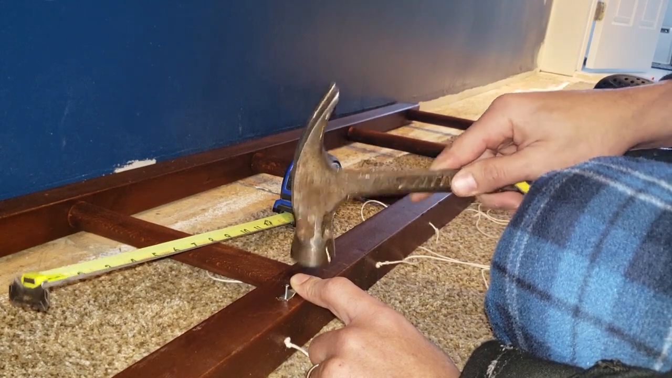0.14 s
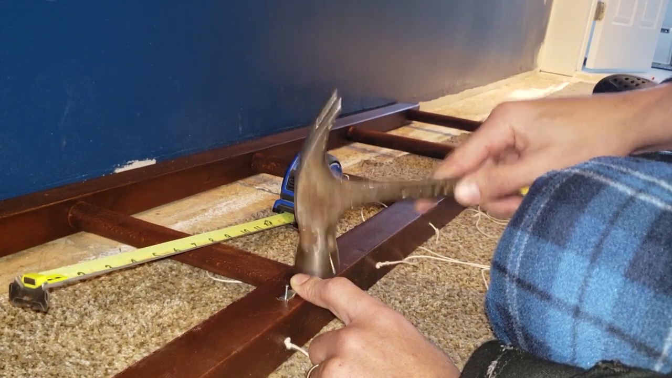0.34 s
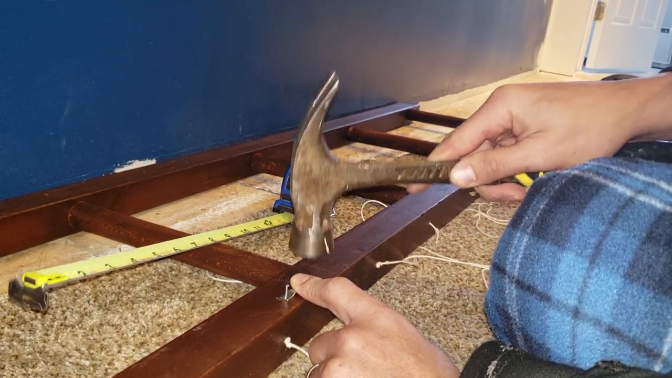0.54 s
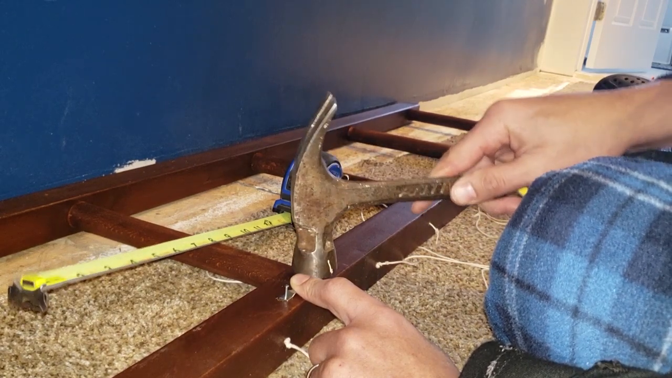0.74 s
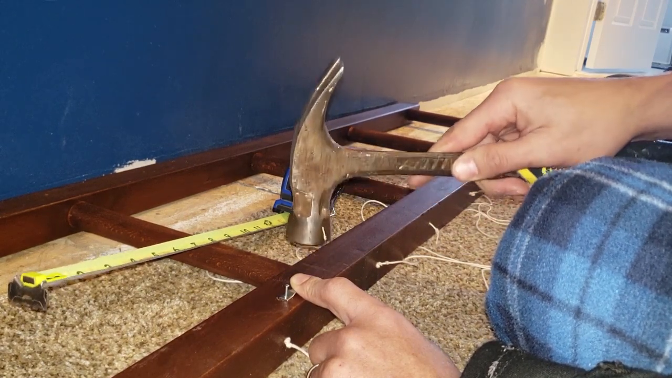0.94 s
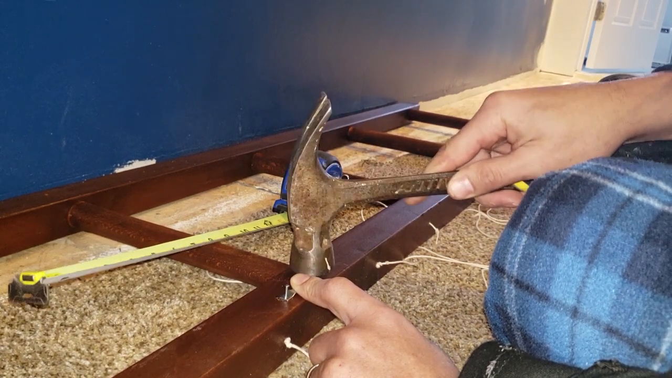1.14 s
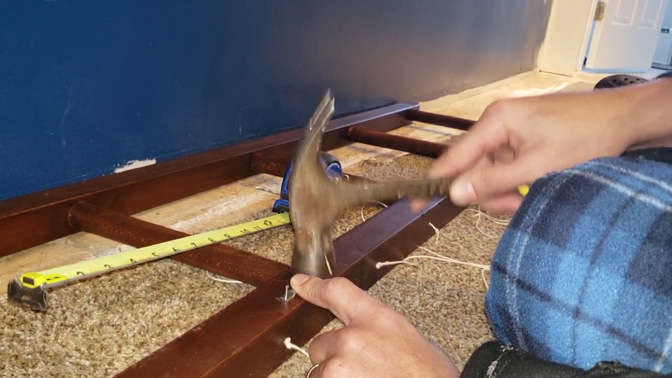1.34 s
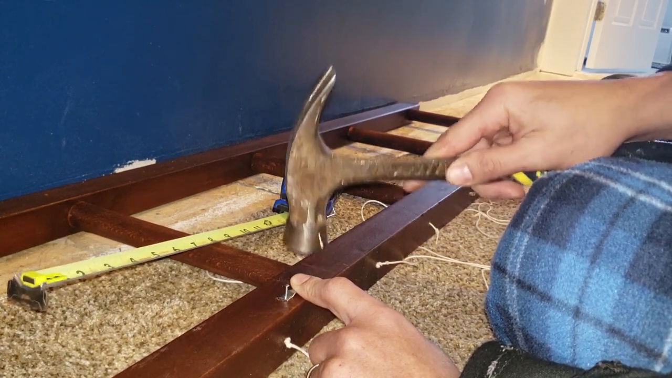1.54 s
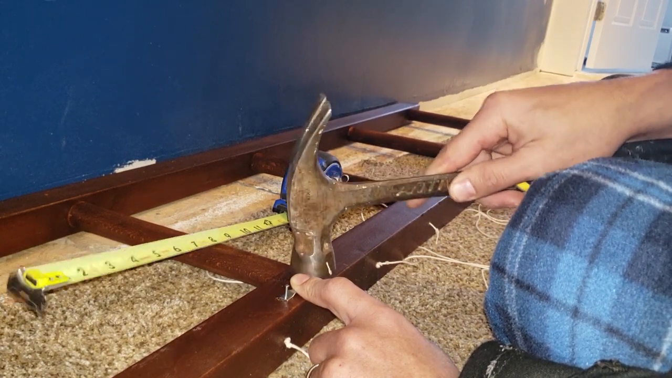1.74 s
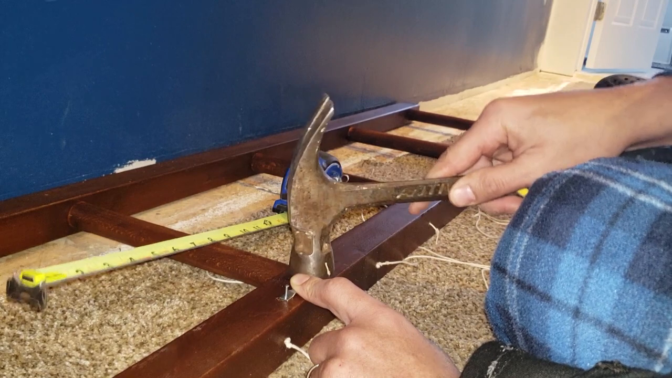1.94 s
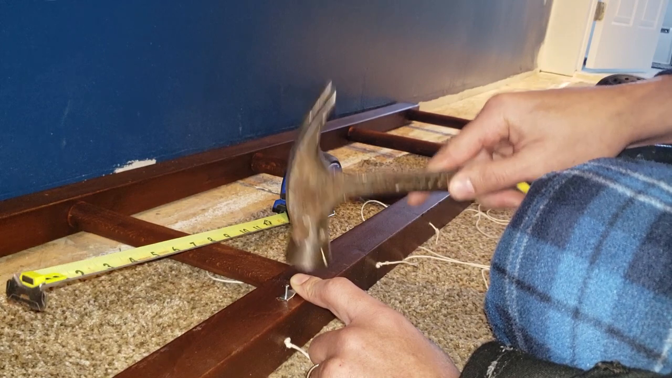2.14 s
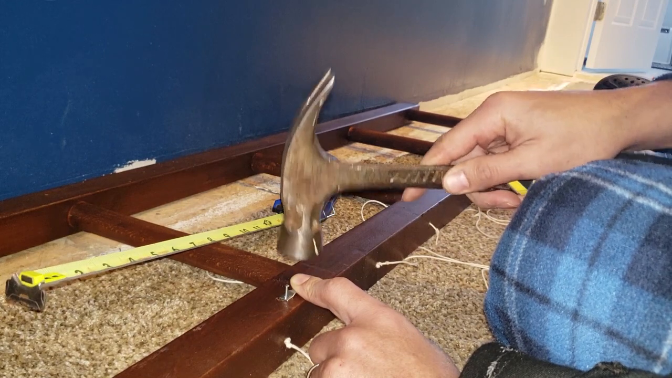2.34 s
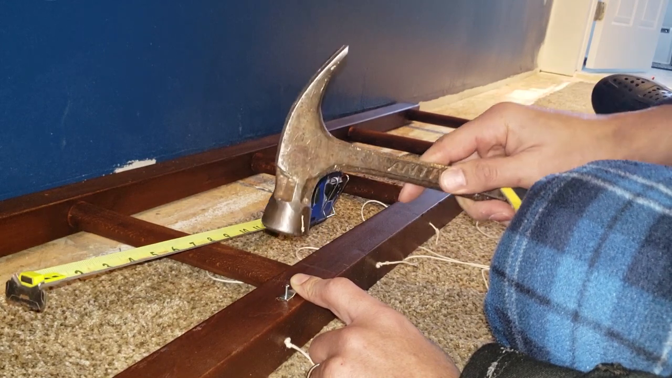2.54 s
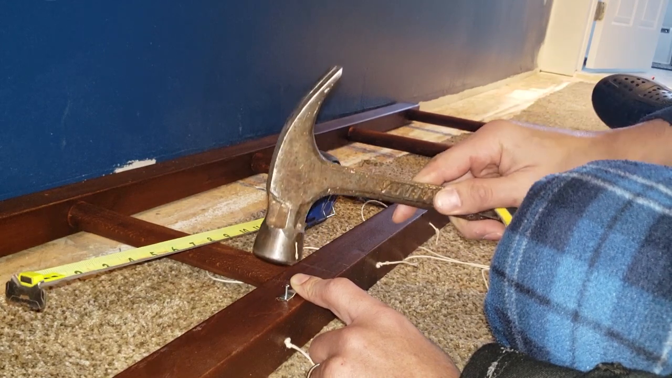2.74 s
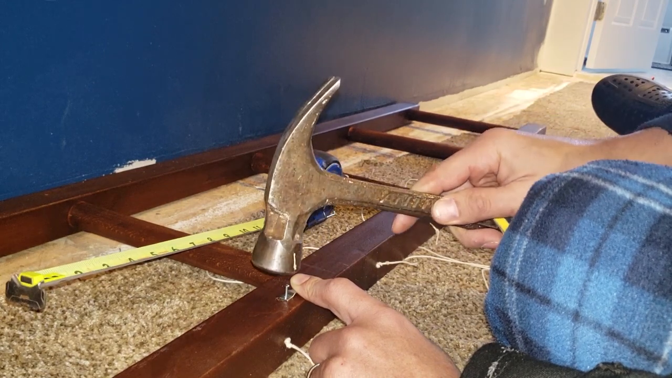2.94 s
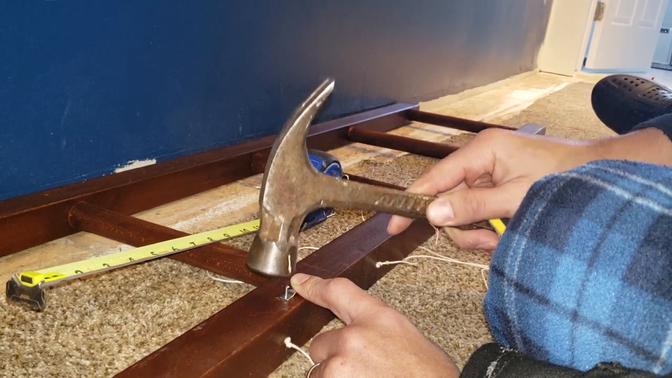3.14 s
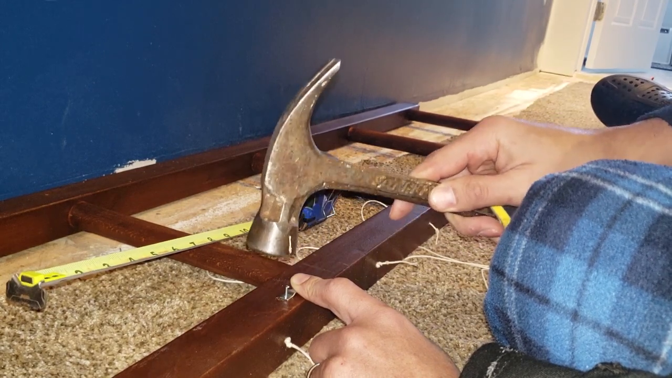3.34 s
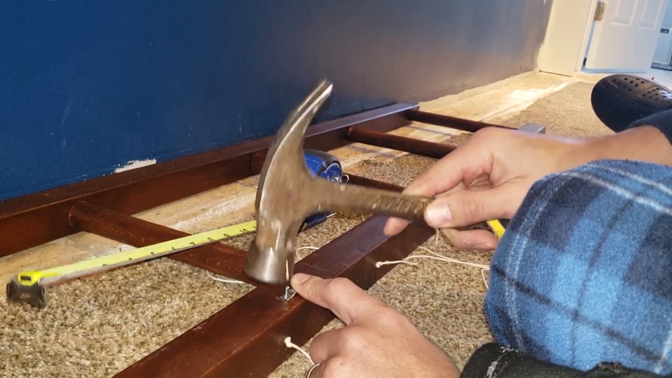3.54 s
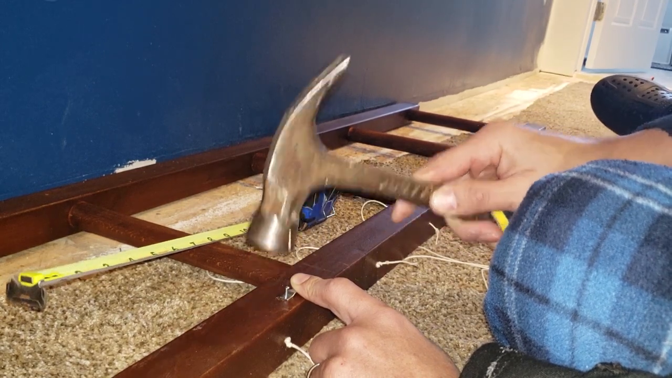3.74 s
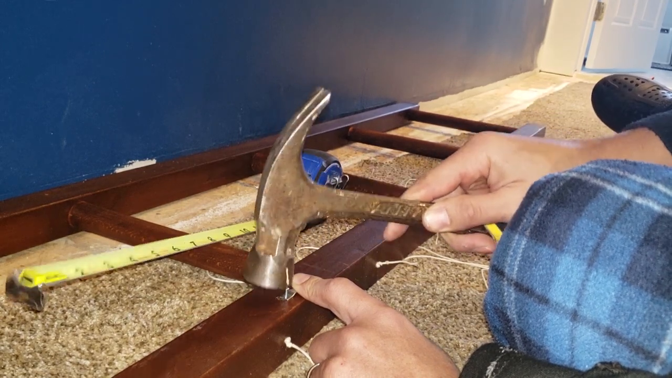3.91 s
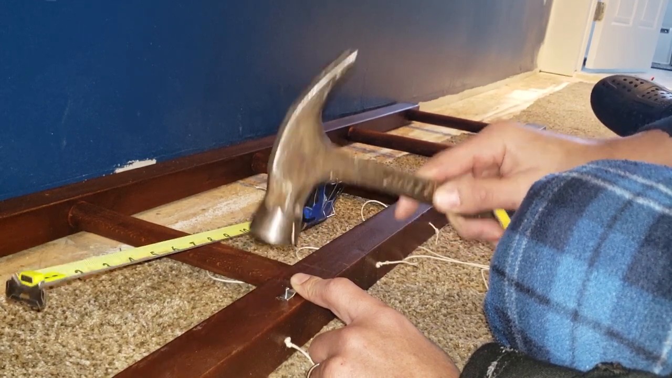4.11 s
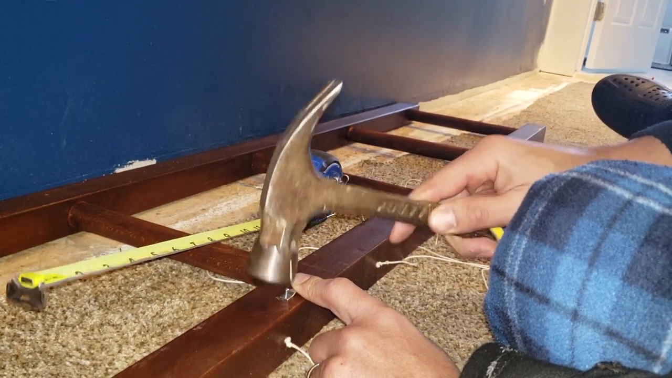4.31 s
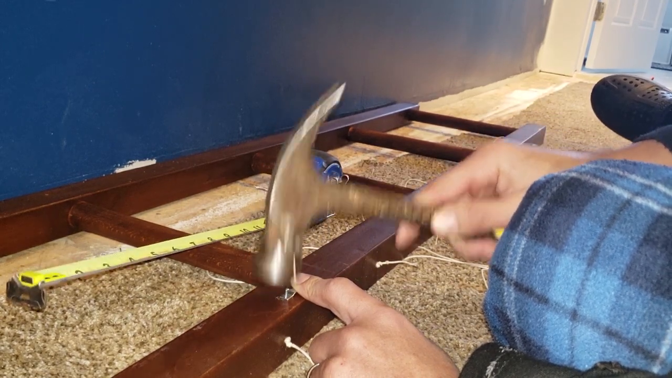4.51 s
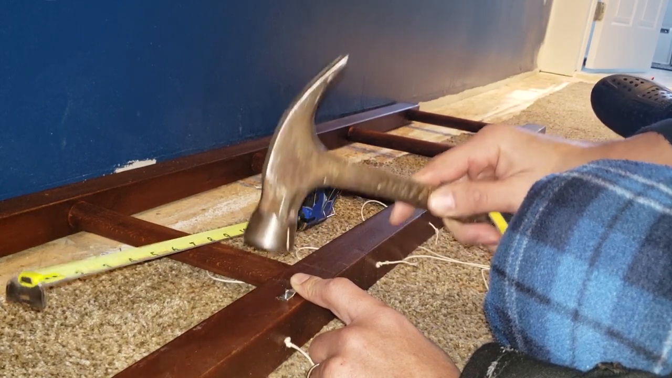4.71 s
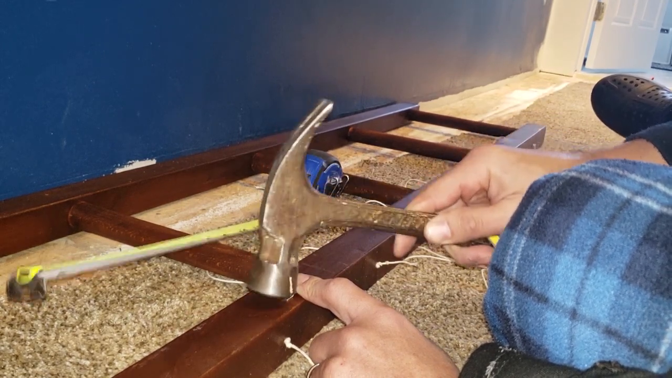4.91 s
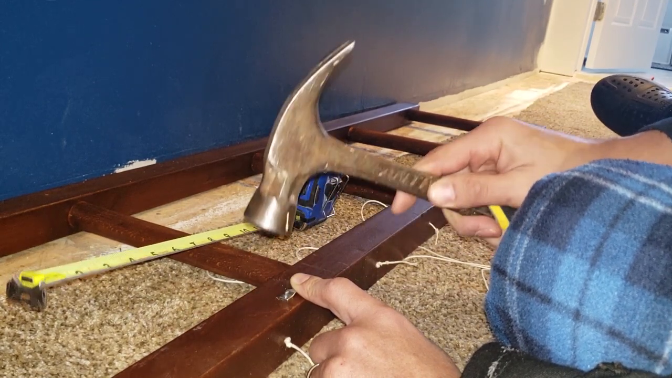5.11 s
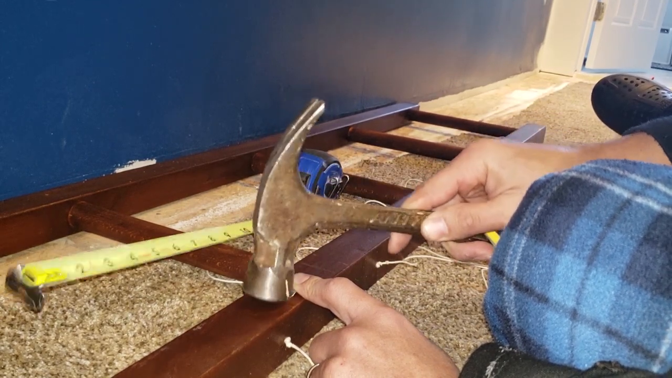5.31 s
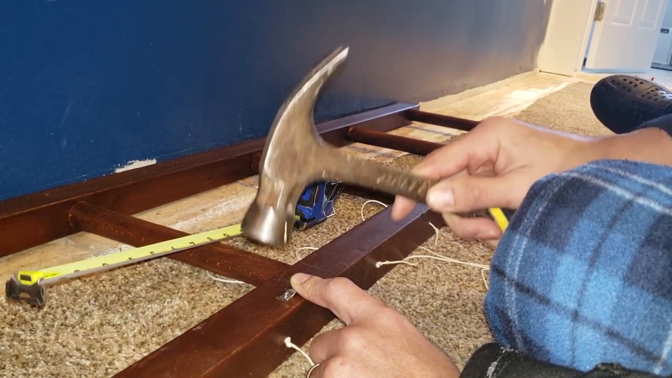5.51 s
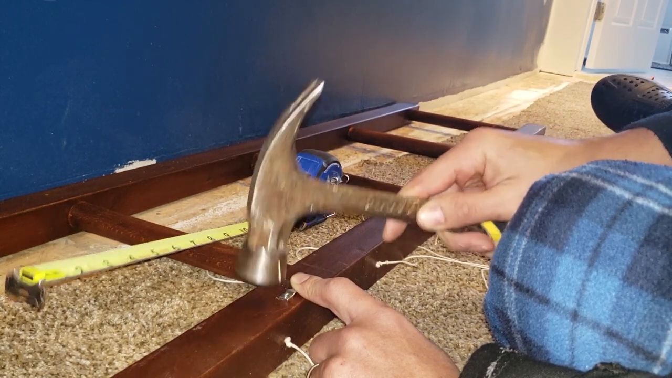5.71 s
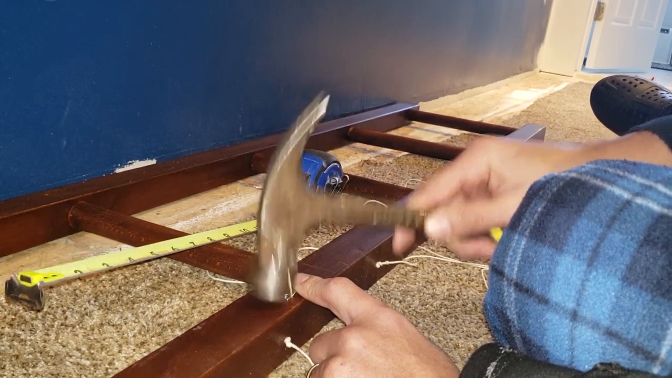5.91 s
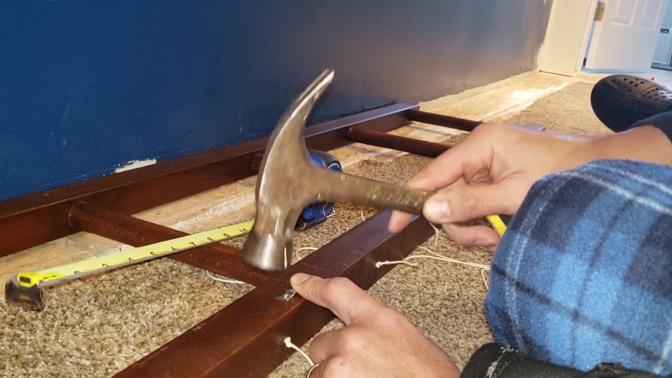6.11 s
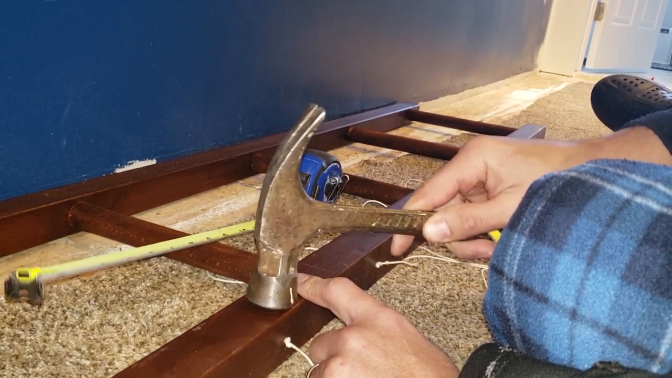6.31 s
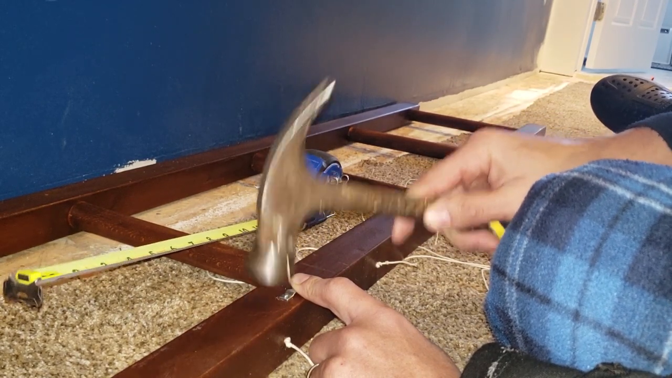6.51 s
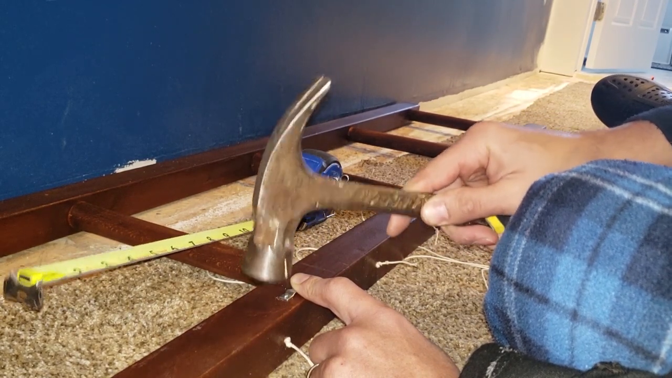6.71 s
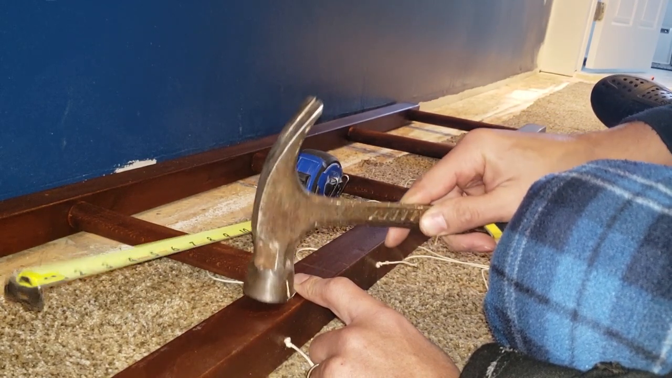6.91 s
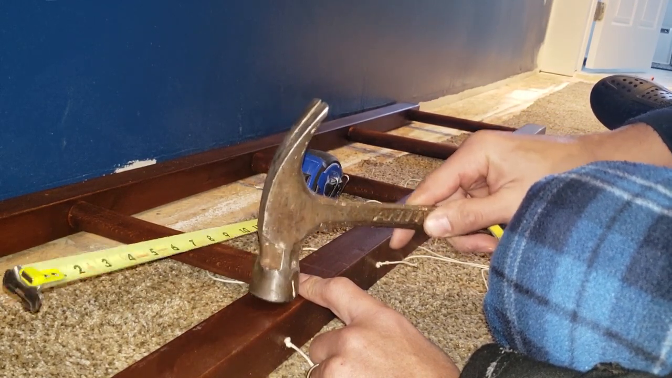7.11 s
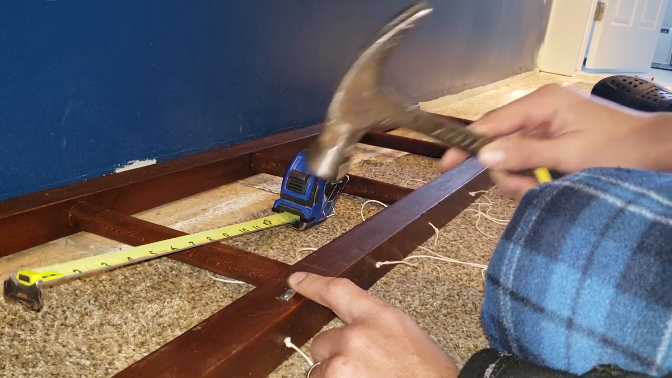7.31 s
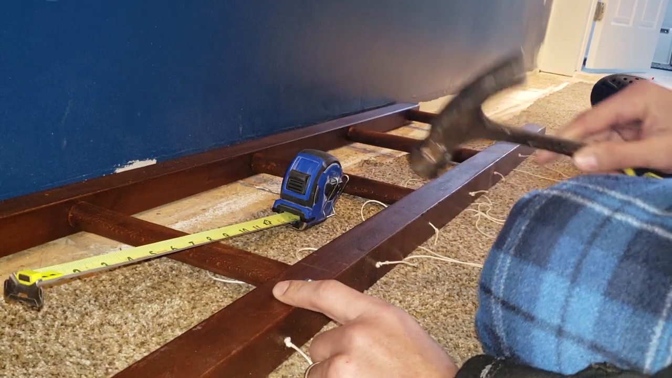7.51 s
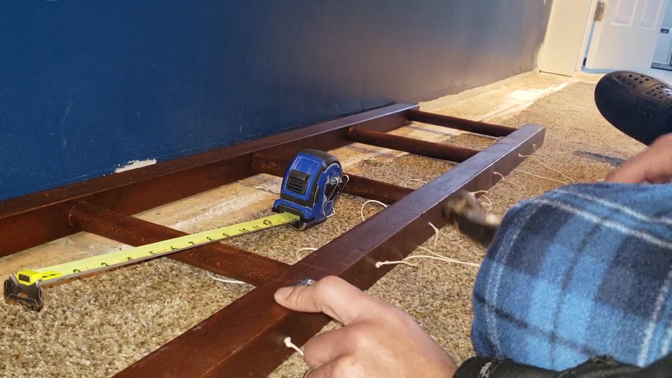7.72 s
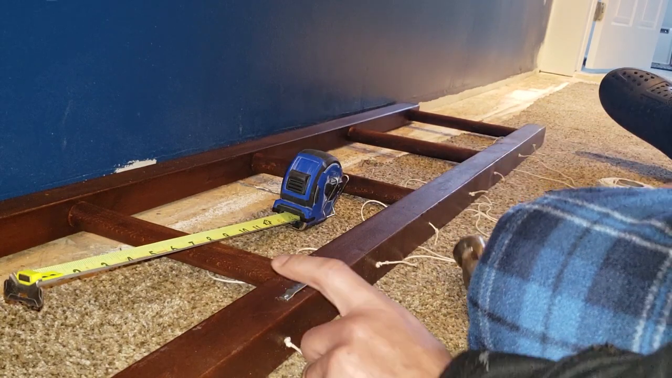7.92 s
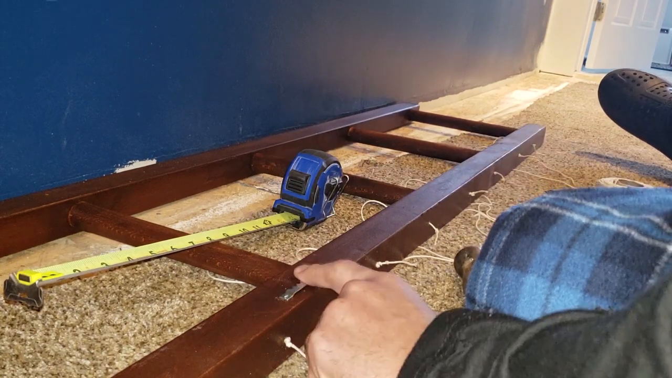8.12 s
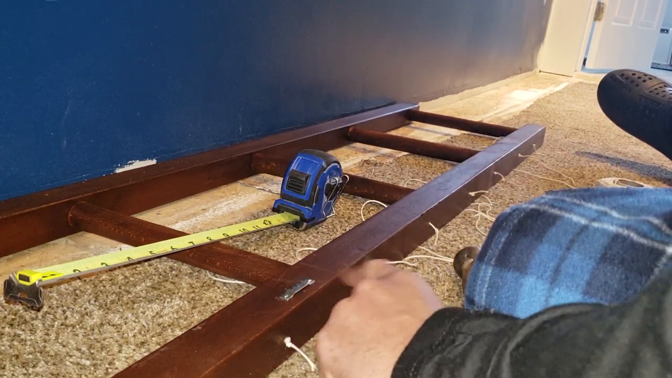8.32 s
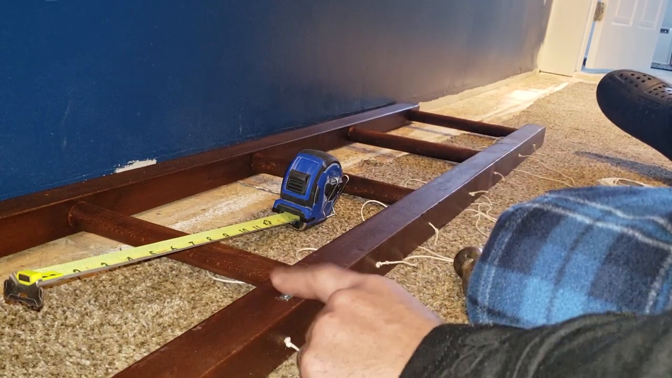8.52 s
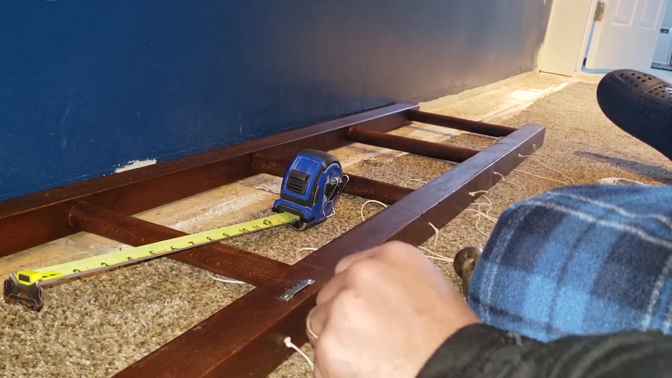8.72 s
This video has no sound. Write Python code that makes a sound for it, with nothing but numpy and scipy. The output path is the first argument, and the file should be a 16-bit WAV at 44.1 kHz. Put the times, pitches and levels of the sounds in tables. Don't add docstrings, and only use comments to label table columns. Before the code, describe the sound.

Close stereo pickup in a small furnished room with short echoes and a faint low hum of pipes and ducts. From 0 to 2.2 seconds, eight hard hammer blows land on a nail in a wooden frame, roughly every 0.35 seconds and slightly faster at the end; each is a woody knock with a steel crack and low floor boom, the boom lessening as the nail seats. Thin steel tape buzzes and slaps after most hits. A gap follows. At 3.0 a very soft, dull thud starts the second nail, then taps at 3.45 and 3.8 grow stronger. From 4.2 to 7.1 firm blows continue, speeding up, with the frame bouncing on carpet and tape chattering, ending in solid, drier knocks. The echo fades; a barely audible thin ring at 7.4, tiny finger rubs at 7.75, 8.3 and 8.6, and soft low knee thumps near 8.0 and 8.55 remain over the hum.

```python
import sys
import numpy as np
from scipy import signal
from scipy.fft import rfft, irfft
from scipy.io import wavfile
from scipy.ndimage import uniform_filter1d

SR = 44100
rng = np.random.default_rng(int(sys.argv[2]) if len(sys.argv) > 2 else 0)


def amplitude_ratio(level_db):
    exponent = np.asarray(level_db, float) / 20
    return 10 ** exponent


def master_out(mix):
    frames = np.transpose(np.atleast_2d(mix))
    ceiling = np.clip(frames, -1, 1)
    pcm = np.round(ceiling * 32767).astype(np.int16)
    wavfile.write(sys.argv[1], SR, pcm)


N = 385875
HALF_S = np.arange(SR // 2) / SR
QUARTER_S = np.arange(SR // 4) / SR

# start_s, knock_db, boom_db, crack_db, tick_db
HAMMER_BLOWS = [(0.001, -10, -8, -19.5, -22.5), (0.396, -8.5, -12, -19, -23),
                (0.723, -5.5, -13, -20, -28.5), (1.071, -7, -12.5, -19.5, -25.5),
                (1.395, -5, -13.5, -19, -26.5), (1.711, -3.5, -16.5, -18.5, -35.5),
                (1.971, -4, -21, -21.5, -29), (2.206, -5.5, -20, -16.5, -31), (3.038, -44, -4, -49, -42),
                (3.453, -28, -4, -27, -35), (3.814, -19, -5, -23, -42), (4.19, -12.5, -11, -27.5, -35.5),
                (4.571, -15.5, -4.5, -19, -25.5), (4.913, -9, -9.5, -19.5, -24),
                (5.269, -11, -7.5, -15, -20.5), (5.616, -8, -9, -15.5, -24), (5.968, -7, -12.5, -18, -22.5),
                (6.29, -6, -13, -16.5, -22.5), (6.594, -6, -12.5, -15, -28.5),
                (6.856, -4.5, -16, -15, -32.5), (7.084, -4, -17, -15.5, -32)]
# freq_hz, density_db_per_hz
STEEL_TICK = [(7000, -24.5), (10000, -16.5), (12500, -2.5), (14000, 3.5), (15700, -1)]


def add(track, s, sound):
    i = int(s * SR)
    track[i:i + len(sound)] += sound[:N - i]


def colour(x, points):
    hz, db = np.transpose(points)
    grid_hz = np.arange(2049) * SR / 4096
    log_gain = np.interp(np.log(grid_hz + 1), np.log(hz), db) * np.log(10) / 20
    cepstrum = irfft(log_gain)
    cepstrum[1:2048] *= 2
    cepstrum[2049:] = 0
    response = irfft(np.exp(rfft(cepstrum)))
    return signal.fftconvolve(x, response)[:len(x)]


def even(x, size=2):
    n = x.shape[-1]
    spectrum = rfft(x, 2 * n)
    humps = np.sqrt(uniform_filter1d(np.abs(spectrum) ** 2, size))
    return irfft(spectrum / humps)[..., :n]


def fade(t, t60):
    return (t >= 0) * 1000. ** (-np.abs(t) / t60)


def unit(x):
    return x / np.max(np.abs(x))


def rings(hz, size, t60, t):
    return np.sum(size * np.sin(2 * np.pi * hz * t) * fade(t, t60), axis=0)


def walk(rate):
    k = int(SR / rate)
    held = np.repeat(rng.standard_normal(N // k + 1), k)[:N]
    drift = uniform_filter1d(held, k)
    return drift / np.std(drift)


def burst(same, t60, points, fresh=1.0, strike=0):
    noise = same + fresh * rng.standard_normal(len(QUARTER_S))
    pulse = strike * (QUARTER_S == 0)
    return unit(colour(even(noise * fade(QUARTER_S, t60) + pulse, size=80), points))


def hammer():
    # freq_hz, level_db, t60_s
    standing = [(625, -16.5, 0.34), (810, -12.5, 0.45), (990, -10, 0.16), (1037, -4.5, 0.19),
                (1300, -3, .09), (1351, 2.5, 0.088), (1760, -8, 0.27), (2130, -4, .09), (2420, -8, 0.066),
                (2530, -10.5, .1), (2648, -8, 0.16), (3100, -18.5, .1), (4700, -15.5, 0.16),
                (5140, -18.5, .1)]
    # freq_hz, level_db, t60_s
    home = [(456, -19.5, 0.3), (617, -16, 0.18), (812, -10, 0.6), (874, -5.5, 0.24), (1004, -1.5, 0.27),
            (1049, -5.5, .18), (1216, -6.5, 0.13), (1317, -4.5, 0.13), (1730, -10.5, 0.16), (1740, -7, .1),
            (2440, -14.5, 0.11), (2480, -16.5, 0.12), (2777, -7.5, 0.26), (4300, -22.5, 0.095)]
    # freq_hz, density_db_per_hz
    first_nail = [(250, -22.5), (550, -10.5), (850, -3), (1300, -2), (1900, -3), (2700, -6), (3600, -18),
                  (5500, -37)]
    second_nail = [(250, -21), (550, -9), (850, -0.5), (1300, -4.5), (1900, -7.5), (2700, -6), (3600, -22),
                   (5500, -35.5)]
    seated_nail = [(250, -16.5), (550, -8.5), (850, -2), (1100, -2), (1400, -1.5), (1900, -3), (2700, -3),
                   (4000, -24)]
    # freq_hz, density_db_per_hz
    steel_crack = [(1500, -46), (2600, 0), (3800, -4), (5000, -8), (6500, -11.5), (8000, -19),
                   (10000, -20.5), (12000, -27)]
    # freq_hz, density_db_per_hz
    cross_bars = [(120, -32.5), (200, -4), (260, 1.5), (330, -6.5), (450, -3.5), (650, -22)]
    # freq_hz, gain_db
    knock_tone = [(250, 4), (420, 2), (700, 0), (1100, 0.5), (1400, 0.5), (1700, 2), (2100, 1), (3200, -1.5)]
    air, snap, ground = np.zeros((3, N))
    boom, thud = board_boom(), joist_thud()
    wood, steel = rng.standard_normal((2, len(QUARTER_S)))
    standing_signs = rng.choice([-1, 1], (len(standing), 1))
    home_signs = rng.choice([-1, 1], (len(home), 1))
    for s, db, boom_db, crack_db, tick_db in HAMMER_BLOWS:
        thud_db = -4.5 + 0.79 * boom_db
        seated = np.clip((-boom_db - 12) / 6, 0, 1)
        modes = (1 - seated) * amplitude_ratio(-5.5) * frame(standing, standing_signs)
        modes = modes + seated * amplitude_ratio(3) * frame(home, home_signs)
        loose_nail = np.array(first_nail if s < 3 else second_nail)
        body = (1 - seated) * loose_nail + seated * np.array(seated_nail)
        knock = amplitude_ratio(-0.5) * burst(wood, 0.065, body, fresh=1.1, strike=3.2) + modes
        crack = amplitude_ratio(crack_db + 7.5) * burst(0, 0.079, steel_crack)
        tick = amplitude_ratio(tick_db + 8) * burst(0, 0.16, STEEL_TICK)
        bars = amplitude_ratio(thud_db - 2) * burst(steel, 0.15, cross_bars)
        add(air, s, amplitude_ratio(db) * (knock + crack + tick + bars))
        add(snap, s + 0.0003, amplitude_ratio(db + crack_db + 13.5) * burst(steel, 0.017, steel_crack, fresh=0.7))
        add(snap, s + 0.00033, amplitude_ratio(db + tick_db + 22) * burst(steel, 0.013, STEEL_TICK, fresh=0.31))
        add(ground, s, amplitude_ratio(db) * (amplitude_ratio(boom_db + 6.5) * boom + amplitude_ratio(thud_db + 10.5) * thud))
    air = air + frame_bounce(wood)
    return colour(air, knock_tone), snap, ground + knee(boom)


def frame(modes, signs, damp=0.39, scatter_db=4.0):
    hz, db, t60 = np.transpose(modes)[:, :, None]
    hz = hz * (1 + 0.008 * rng.standard_normal(hz.shape))
    db = db + scatter_db * rng.standard_normal(hz.shape)
    return unit(rings(hz, signs * amplitude_ratio(db), damp * np.minimum(t60, 300 / hz), QUARTER_S))


def floor_ring(modes):
    hz, size, t60, late = np.transpose(modes)[:, :, None]
    return unit(np.convolve(rings(hz, size, t60, HALF_S - late), np.hanning(130), "same"))


def board_boom():
    # freq_hz, signed_size, t60_s, travel_s
    boards = [(52, .43, .052, .0073), (55, -.036, .5, .001), (67, -.39, .19, .009), (82, .067, .3, .0027)]
    return floor_ring(boards)


def joist_thud():
    # freq_hz, signed_size, t60_s, travel_s
    joists = [(110, .1, .18, .0034), (134, -.23, .043, .0081), (242, -.085, .08, .0079),
              (249, -.065, .13, .0023)]
    return floor_ring(joists)


def frame_bounce(wood):
    # start_s, peak_db
    landings = [
        (3.053, -42),
        (3.854, -19.5),
        (4.611, -12),
        (4.953, -12),
        (5.315, -7),
        (5.67, -15.5),
        (6.009, -7.5),
        (6.633, -7),
    ]
    # freq_hz, density_db_per_hz
    landing_colour = [(250, -11.5), (550, -10), (850, 0.5), (1300, -5), (2400, -6), (3200, -14.5),
                      (5500, -30.5)]
    out, onset = np.zeros(N), 1 - np.exp(-QUARTER_S / 0.0033)
    for s, db in landings:
        add(out, s, amplitude_ratio(db + 1.0) * onset * burst(wood, 0.05, landing_colour, fresh=1.5))
    return out


def knee(boom):
    # start_s, peak_db
    shifts = [
        (8.032, -37.5),
        (8.554, -43),
        (8.70, -50),
    ]
    out = np.zeros(N)
    for s, db in shifts:
        add(out, s, amplitude_ratio(db - 1.5) * np.convolve(boom, np.hanning(350), "same") / 175)
    return out


def tape():
    # freq_hz, density_db_per_hz
    buzz = [(1000, -24), (2200, -13.5), (4000, 1.5), (6500, -3.5), (9500, -12), (12500, -7.5),
            (15700, -2.5)]
    # first_s, last_s, first_slap_db, slap_count
    slap_runs = [(0.142, 0.245, -33.5, 4), (0.490, 0.594, -34, 4), (0.818, 0.922, -30, 4),
                 (1.202, 1.314, -57, 4), (1.53, 1.627, -36.5, 4), (1.852, 1.925, -32.5, 3),
                 (3.506, 3.542, -31.5, 2), (3.902, 3.94, -30.5, 2), (4.002, 4.111, -38.5, 4),
                 (4.331, 4.43, -31, 4), (4.632, 4.724, -38.5, 3), (4.795, 4.851, -34, 3),
                 (5.065, 5.2, -31.5, 5), (5.421, 5.561, -33, 5), (5.74, 5.822, -29, 3),
                 (6.093, 6.234, -30, 5), (6.378, 6.565, -35.5, 5), (6.708, 6.816, -33, 4),
                 (7.02, 7.065, -39.5, 3), (7.223, 7.26, -36, 2), (7.370, 7.400, -58.5, 2)]
    # freq_hz, density_db_per_hz
    slap_body = [(3000, -21.5), (4500, -5.5), (6000, -3), (7500, -8.5), (10000, -11.5)]
    out, onset = np.zeros(N), 1 - np.exp(-QUARTER_S / 0.001)
    throb = amplitude_ratio(11 * np.cos(2 * np.pi * 27 * HALF_S))
    stop = np.clip((0.33 - HALF_S) / 0.094, 0, 1)
    for s, db, boom_db, *_ in HAMMER_BLOWS:
        graininess = amplitude_ratio(3 * np.repeat(rng.standard_normal(len(HALF_S) // 90), 90))
        grains = rng.standard_normal(len(HALF_S)) * graininess
        add(out, s, amplitude_ratio(db + boom_db - 21.0) * colour(grains * throb * fade(HALF_S, 0.58) * stop, buzz))
    fall_db, low_db, scatter_db = 2, -5.5, 1.5
    for first, last, db, slaps in slap_runs:
        for k, s in enumerate(np.linspace(first, last, round(slaps))):
            vary_db, vary_low_db = scatter_db * rng.standard_normal(2)
            slap = burst(0, 0.015, STEEL_TICK)
            slap = slap + amplitude_ratio(low_db + vary_low_db) * burst(0, 0.082, slap_body)
            add(out, s, amplitude_ratio(db - k * fall_db + vary_db) * onset * slap)
    return out


def hammer_head():
    # start_s, freq_hz, level_db, t60_s
    head = (7.37, 6669, -70, .5)
    s, hz, db, t60 = head
    out, onset = np.zeros(N), 1 - np.exp(-HALF_S / 0.037)
    add(out, s, amplitude_ratio(db) * onset * np.sin(2 * np.pi * hz * HALF_S) * fade(HALF_S, t60))
    return out


def finger():
    # start_s, length_s, hiss_db, hum_db
    wipes = [
        (7.75, 0.11, -94, -74),
        (8.271, 0.075, -80.5, -74),
        (8.614, 0.1, -78.5, -66.5),
    ]
    t, out = np.arange(N) / SR, 0
    skin = [(500, 19), (3000, 6), (6000, 4), (9500, 3), (14000, 15), (15800, 4.5)]  # freq_hz, gain_db
    hiss = colour(rng.standard_normal(N), skin)
    mode = signal.butter(2, [1100, 1135], "band", fs=SR, output="sos")
    hum = signal.sosfilt(mode, rng.standard_normal(N))
    hum = hum / np.std(hum)
    for s, length, hiss_db, hum_db in wipes:
        stroke = np.sin(np.pi * np.clip((t - s) / length, 0, 1))
        out = out + stroke * (amplitude_ratio(hiss_db + 2.5) * hiss + amplitude_ratio(hum_db) * hum)
    return out * amplitude_ratio(1.5 * walk(60))


def carpet(x, t60=0.0042, db=-3):
    t = QUARTER_S[:600]
    paths = even(rng.standard_normal(len(t)) * fade(t - 0.0004, t60))
    paths = paths * np.array([[1], [-1]])
    treble = colour(x, [(500, -17.0), (1500, 3.5), (9000, -3.5)])
    return amplitude_ratio(db) * signal.fftconvolve(treble[None], paths, axes=1)[:, :N]


def room():
    # freq_hz, t60_s
    decay = [(150, 0.42), (900, 0.38), (2500, 0.37), (6000, 0.21), (13000, 0.077)]
    hz, t60 = np.transpose(decay)
    tail, noise = 0, rfft(rng.standard_normal((2, len(HALF_S))))
    at_hz = np.arange(noise.shape[1]) * SR / len(HALF_S) + 1
    alike = np.exp(-(at_hz / 750) ** 2)
    noise[1] = alike * noise[0] + np.sqrt(1 - alike ** 2) * noise[1]
    for share, band_t60 in zip(np.eye(len(hz)), t60):
        band = np.interp(np.log(at_hz), np.log(hz), share)
        tail = tail + irfft(noise * band, len(HALF_S)) * fade(HALF_S, band_t60)
    return even(tail * (1 - np.exp(-(HALF_S / 0.0065) ** 2)), size=120)


def ports(x):
    # freq_hz, left_minus_right_db
    shading = [(60, -1.2), (250, 1.2), (700, -1), (1300, -2.8), (2400, -2.4), (4400, 3.2), (15000, 3)]
    lag = 7
    half = np.array(shading) * [1, 0.5]
    late = np.r_[np.zeros(lag), x[1, :-lag]]
    return np.array([colour(x[0], half), colour(late, half * [1, -1])])


def house():
    # freq_hz, width_hz, level_db
    drones = [(60, 27, -7), (83.5, 34, -3.5), (158.3, 9, -2.5), (220.3, 13, -14.5), (263.7, 48, -9.5),
              (312.5, 11, -11), (384, 88, -14.5), (457, 86, -23)]
    # time_s, level_db
    draught = [
        (0, -2.5),
        (2.5, -2),
        (3.1, 3),
        (7.3, 0.5),
        (7.8, -1.5),
        (8.1, 1),
        (8.75, -6),
    ]
    # freq_hz, density_db_per_hz
    hiss_colour = [(300, -27.5), (480, -11.5), (620, -20), (850, -23.5), (1000, -19), (1500, -21.5),
                   (2150, -8.5), (2600, -21), (3050, -40), (8000, -36.5), (11500, -44.5), (12500, -56.5)]
    t, swell = np.arange(N) / SR, []
    flow_db = np.interp(t, *np.transpose(draught))
    # level at rest, shaking by blows, t60 in s
    for rest_db, shake_db, t60 in [(-56, -20, 0.66), (-61, -35.5, 1.2)]:
        shaken = sum(amplitude_ratio(db + boom_db + shake_db) * fade(t - s, t60) for s, db, boom_db, *_ in HAMMER_BLOWS)
        swell.append(amplitude_ratio(rest_db + flow_db) + shaken)
    hiss = np.array([colour(n, hiss_colour) for n in rng.standard_normal((2, N))])
    out = amplitude_ratio(-70) * hiss / np.std(hiss)
    for hz, width, db in drones:
        sos = signal.butter(2, [hz - 0.5 * width, hz + 0.5 * width], "band", fs=SR, output="sos")
        mid, side = signal.sosfilt(sos, rng.standard_normal((2, N)))
        level = swell[int(hz > 120)] * amplitude_ratio(db + 1.6 * walk(8.1))
        side = side * np.clip(hz / 900, 0, 1)
        out = out + level * np.array([mid + side, mid - side]) / np.std(mid)
    return out


def scene():
    air, snap, ground = hammer()
    rattle = tape() + hammer_head() + finger()
    near = air + snap + rattle
    send = amplitude_ratio(-3.5) * air + amplitude_ratio(-6.5) * snap + amplitude_ratio(-18.5) * ground + amplitude_ratio(-4) * rattle
    turn = 2 * np.pi * np.arange(N) / N
    wet = 0
    for part in (np.cos(turn), np.sin(turn)):
        wet = wet + signal.fftconvolve((send * part)[None], room(), axes=1)[:, :N]
    return ports(amplitude_ratio(-1.5) * near + carpet(near) + ground + wet) + house()


def band_limit(x):
    return signal.sosfilt(signal.butter(12, 17090, fs=SR, output="sos"), x)


def record(dry):
    # freq_hz, gain_db
    top_cut = [(15750, 0), (15950, -18), (16700, -21), (17100, -70)]
    rounded = np.tanh(0.9 * dry) / 0.9
    mix = np.array([colour(x, top_cut) for x in rounded])
    return band_limit(mix)


dry = scene()
out = record(dry)
master_out(out)
```